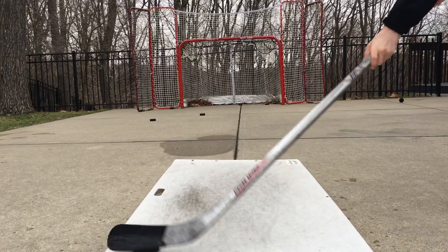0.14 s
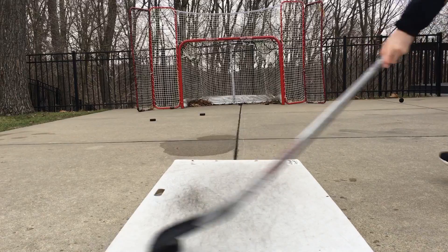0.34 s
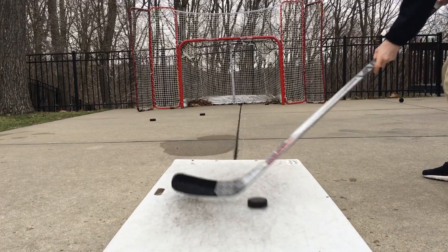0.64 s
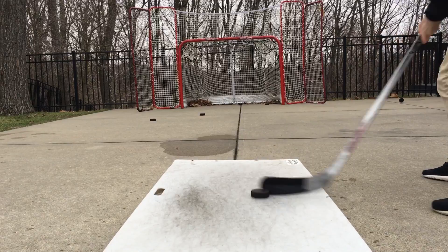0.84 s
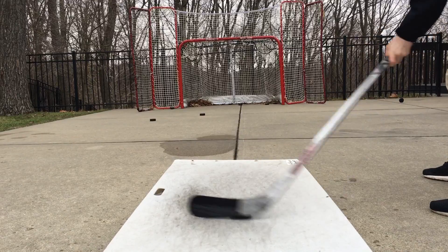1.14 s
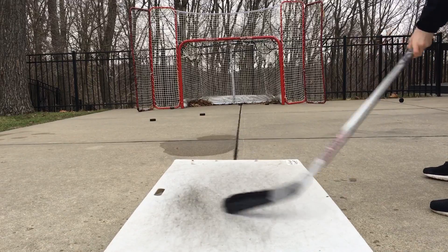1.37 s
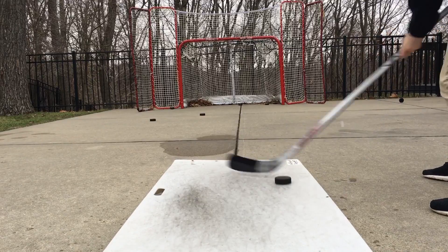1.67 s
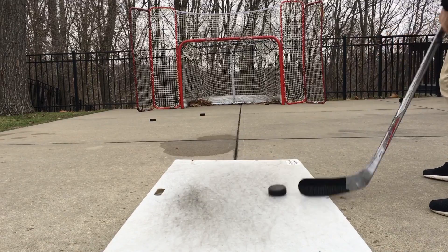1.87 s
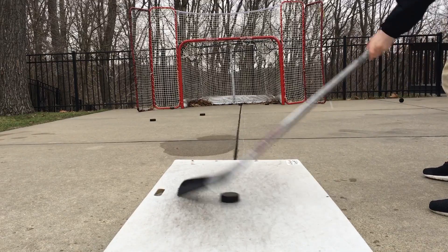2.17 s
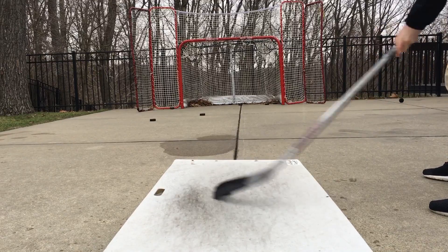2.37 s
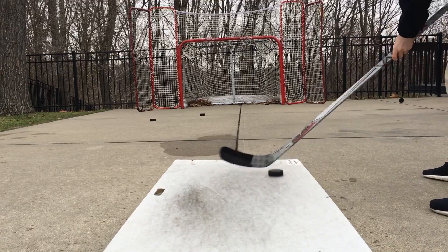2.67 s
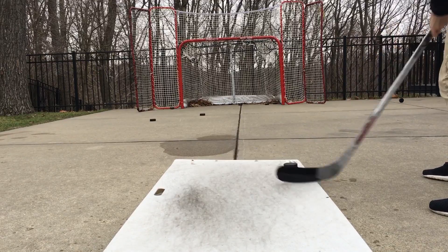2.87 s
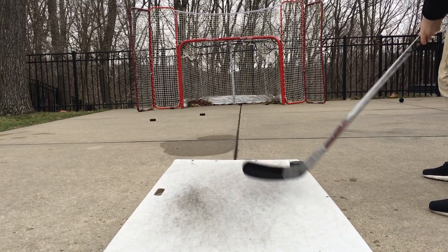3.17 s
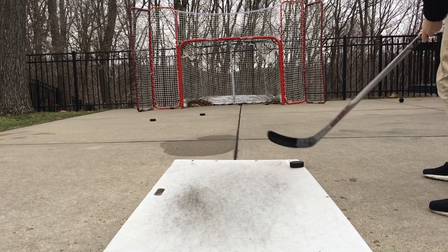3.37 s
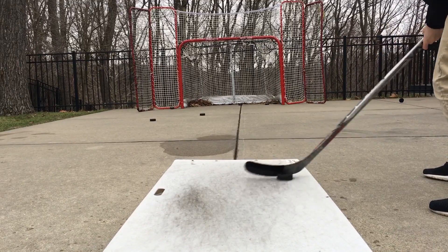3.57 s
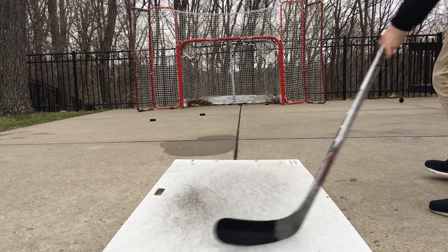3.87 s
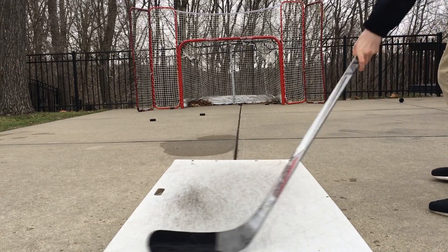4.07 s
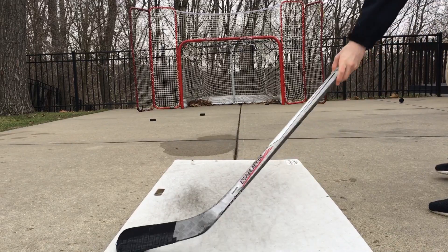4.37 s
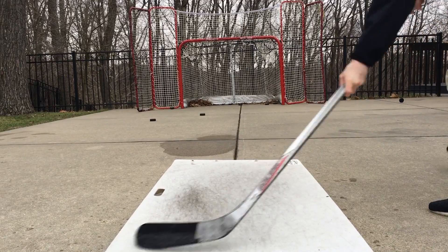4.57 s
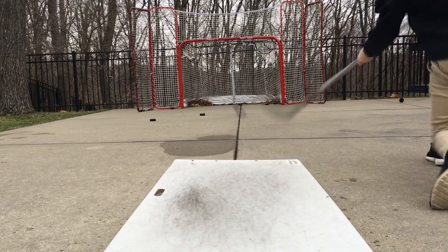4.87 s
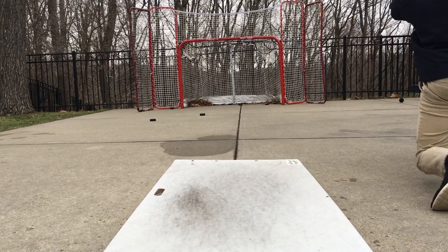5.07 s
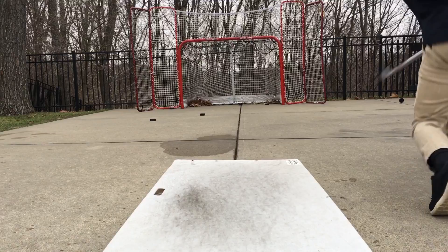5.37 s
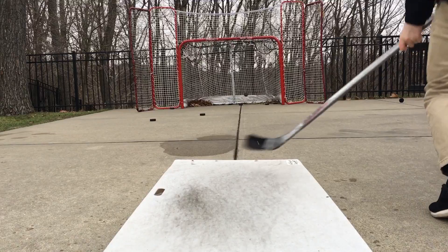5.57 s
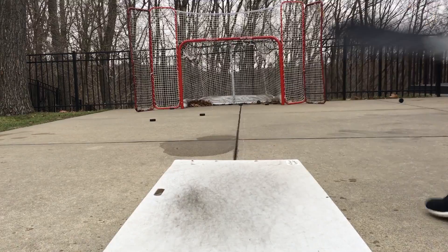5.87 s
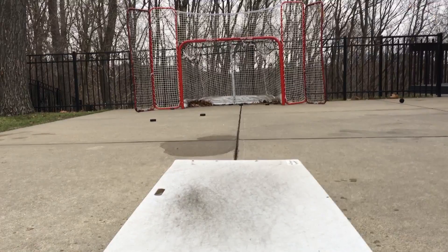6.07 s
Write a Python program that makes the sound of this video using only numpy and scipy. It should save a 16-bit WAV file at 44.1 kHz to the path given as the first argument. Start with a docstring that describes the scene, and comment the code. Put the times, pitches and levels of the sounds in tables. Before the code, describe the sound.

On a driveway, wind rumbles on the microphone over faint distant traffic while a hockey puck hisses across a plastic pad nearby. The stick blade clacks against puck and pad in an irregular rhythm, squeaking briefly, with a dull echo from the surroundings. After a few soft footsteps comes a sharp shot, followed by rustling mesh, a faint ring of the goal frame, one farther knock of the falling puck and shoes scuffing concrete.

```python
"""A puck slides, hissing, over a gritty plastic pad on a driveway, heard through one microphone
with wind buffeting it and a far road humming behind. A hockey stick dribbles the puck to and fro:
the blade knocks on puck and pad, its taped edge squeaks, and house and fence echo dully.
Shoes thump, then the shot goes into the net: the mesh rustles, the steel frame rings faintly,
the puck drops onto the goal's base and soles scuff the concrete."""
import sys
import numpy as np
from scipy import signal
from scipy.fft import rfft, irfft, next_fast_len
from scipy.io import wavfile
from scipy.ndimage import uniform_filter1d, map_coordinates

SR = 44100
rng = np.random.default_rng(int(sys.argv[2]) if len(sys.argv) > 2 else 0)


def store_wav(level_fs):
    """Save 16-bit WAV to argv[1]."""
    pcm = np.round(np.clip(np.atleast_2d(level_fs), -1, 1) * 32767)
    wavfile.write(sys.argv[1], SR, pcm.T.astype(np.int16))


N = 274919
TIME = np.arange(N) / SR


def from_db(db):
    """Decibels to gain."""
    return 10 ** (np.asarray(db) / 20)


def rms_one(x):
    """Scale to unit rms."""
    return x / np.sqrt(np.mean(x ** 2) + 1e-20)


def gain_curves(rows):
    """Each dB column of a timed table as a gain per sample."""
    times, *columns = np.transpose(rows)
    return [from_db(np.interp(TIME, times, db)) for db in columns]


def add(out, start_s, sound):
    """Mix a sound in at its start time."""
    i = int(start_s * SR)
    out[i:i + len(sound)] += sound[:N - i]


def colour(x, spectrum):
    """Shape a steady signal with a spectrum, at unit rms."""
    hz, db = np.transpose(spectrum)
    size = next_fast_len(N)
    bins_hz = np.maximum(np.fft.rfftfreq(size, 1 / SR), 1)
    gains = from_db(np.interp(np.log(bins_hz), np.log(hz), db))
    return rms_one(irfft(rfft(x, size) * gains, size)[:N])


def resonate(x, hz, width_hz):
    """One resonance with gain 1 at its peak."""
    r = np.exp(-np.pi * width_hz / SR)
    poles = [1, -2 * r * np.cos(2 * np.pi * hz / SR), r * r]
    return signal.lfilter(np.array([1, 0, -1]) * (1 - r * r) / 2, poles, x)


def drift(per_s):
    """A random curve that takes a new value per_s times a second."""
    knots = np.arange(0, TIME[-1] + 1, 1 / per_s)
    return np.interp(TIME, knots, rng.standard_normal(N)[:len(knots)])


def grit(per_s, spread_db, clump_db):
    """Tiny clicks of uneven size that come in clumps."""
    sizes = from_db(spread_db * np.minimum(rng.exponential(1, N), 4)) * rng.standard_normal(N)
    clicks = sizes * (rng.random(N) < per_s / SR)
    return rms_one(clicks * from_db(clump_db * drift(per_s=140)))


def patchy(x, depth_db, patch_s, patch_hz):
    """Each patch of grit briefly favours a few pitches of its own."""
    hz, times, frames = signal.stft(x, SR, nperseg=512)
    grid = np.meshgrid(hz / patch_hz, times / patch_s, indexing="ij")
    favour = map_coordinates(rng.standard_normal(frames.shape), grid, order=1, mode="mirror")
    return signal.istft(frames * from_db(depth_db * favour), SR)[1][:N]


# the four voices of friction on the pad, low to high: (frequency [Hz], relative level [dB])
PAD_RUMBLE = [(200, -8), (350, -3), (490, -12.5), (630, 8.5), (830, -1.5), (1000, -2), (1400, 0),
              (2100, -6), (2800, -8.5), (5000, -91)]
RASP = [(1400, -9.5), (2300, 0), (3300, 3), (4400, 1.5), (5100, -8.5), (6500, -37)]
HISS = [(4300, -33), (5200, -4.5), (5900, 5), (6600, 3.5), (7300, 4.5), (8100, -3.5), (8700, -6),
        (9700, -27.5), (10500, -42), (16000, -58)]
SIZZLE = [(7000, -38), (9500, 9.5), (10400, -0.5), (11500, 4), (13500, -2.5), (16000, -9)]
# the puck crossing the pad, louder with speed, bright when free and dull when the blade drags with it:
# (time [s], level [dB], brightness [dB])
GLIDE = [(0, -37.5, -10.5), (.1, -48, -1), (.3, -54, -5.5), (.4, -39.5, -2), (.72, -42.5, 0),
         (1.0, -42.5, 2.5), (1.3, -44, -2), (2.1, -41, 0), (2.8, -40, -1.5), (2.92, -43, -4),
         (3.16, -48, 4.5), (3.19, -63, 1), (3.4, -77, 6), (3.52, -86, 4), (3.54, -39, -1),
         (4.0, -44.5, 3.5), (4.22, -45.5, -4), (4.36, -66.5, 1), (4.59, -84, -11), (4.68, -40.5, 0.5),
         (4.9, -44, 9), (5.1, -64, -9)]
# the glide's balance: (rumble [dB], rasp [dB], hiss [dB], sizzle [dB])
GLIDE_MIX_DB = (2, -2, -1.5, -19.5)
# how the same four voices follow brightness: (slope [dB/dB]) each
GLIDE_BRIGHTENS = (-0.8, 0.13, 1, -0.24)
# the blade pressed down and swept along: (time [s], rise [s], fade [s], level [dB], edge sizzle [dB])
SWEEPS = [(.39, 0.037, 0.038, -40, -7), (.6, 0.083, 0.048, -40, -16), (.92, .05, 0.037, -38.5, -17),
          (1.07, 0.05, 0.029, -35.5, -16), (1.2, 0.044, 0.044, -36.5, -17), (1.37, 0.036, 0.01, -41, -5.5),
          (1.419, 0.01, 0.013, -30, -33), (1.54, 0.034, 0.069, -44.5, -14),
          (1.965, 0.0067, 0.025, -28, -24), (2.026, 0.0098, 0.01, -31, -26), (2.2, .035, 0.015, -38, -15),
          (2.41, 0.0067, 0.011, -29.5, -21), (2.78, 0.014, 0.057, -47, -27),
          (3.595, 0.0095, 0.014, -38, -24), (3.635, .008, 0.0082, -37.5, -25),
          (3.791, 0.049, 0.048, -39.5, -16), (4.79, 0.076, .06, -35, -12.5), (4.87, 0.054, 0.069, -35, -11)]
# a sweep's balance: (rumble [dB], rasp [dB], hiss [dB])
SWEEP_MIX_DB = (-11, -1.5, 0)
def sliding(rumble_follows, rumble_pivot_db, puck_gone_s):
    """Blade and puck catch on the grit: the same tiny clicks drive the pad and hiss at the edges."""
    catches = grit(per_s=12000, spread_db=2.6, clump_db=1.6)
    catches = patchy(catches, depth_db=3, patch_s=0.016, patch_hz=300)
    glide, brightness = gain_curves(GLIDE)
    pivot = from_db(rumble_pivot_db)
    rumble = pivot * (glide / pivot) ** rumble_follows  # takes a share of the glide's swing
    mix = from_db(GLIDE_MIX_DB)[:, None] * brightness ** np.array(GLIDE_BRIGHTENS)[:, None]
    power = (mix * [rumble, glide, glide, glide]) ** 2
    for s, rise, fade, db, sizzle_db in SWEEPS:
        from_peak = np.maximum((s - TIME) / rise, (TIME - s) / fade).clip(0, 10)
        swell = from_db(db) * np.exp(-from_peak ** 2 / 2)
        power += np.outer(from_db([*SWEEP_MIX_DB, sizzle_db]), swell) ** 2
    voices = [colour(catches, spectrum) for spectrum in (PAD_RUMBLE, RASP, HISS, SIZZLE)]
    on_pad = np.clip((puck_gone_s - TIME) * 10, 0, 1)
    return on_pad * np.sum(np.sqrt(power) * voices, axis=0)


# gusts right on the microphone: (time [s], level [dB])
WIND = [(0, -56), (.15, -40.5), (.5, -35), (.8, -43), (.9, -43.5), (1.25, -36.5), (1.65, -26.5),
        (1.9, -46.5), (2.55, -45), (2.62, -26.5), (2.75, -28.5), (2.86, -49), (3.12, -30), (3.6, -47),
        (4.08, -47), (4.24, -25.5), (4.4, -38.5), (4.6, -23), (4.8, -36.5), (5.15, -30), (5.6, -39),
        (5.97, -29), (6.23, -37.5)]
# their deep rumble and the flutter above it: (frequency [Hz], relative level [dB])
GUST = [(10, -14), (25, -4.5), (42, -3), (65, -5.5), (100, -15), (200, -28), (500, -110)]
FLUTTER = [(40, 2), (85, -0.5), (130, -5.5), (200, -8), (350, -23.5), (900, -92)]
def wind(rumble_db, flutter_db, flutter_follows):
    """Wind buffets the microphone; the flutter takes only a share of the gusts' swing."""
    gust, = gain_curves(WIND)
    rumble = from_db(rumble_db) * gust * colour(rng.standard_normal(N), GUST)
    flutter_gain = from_db(flutter_db) * (gust / np.median(gust)) ** flutter_follows
    return rumble + flutter_gain * colour(rng.standard_normal(N), FLUTTER)


# the road, far from the driveway: (time [s], drone level [dB], tyre whine level [dB])
TRAFFIC = [(0, -39.5, -51.5), (.45, -43.5, -50), (.7, -52.5, -43), (3.3, -55, -62.5), (5.2, -47.5, -54),
           (5.6, -47, -57), (5.95, -51, -48), (6.23, -53, -65)]
def traffic(drone_hz, drone_width_hz, whine_hz, whine_width_hz):
    """Far traffic arrives as two narrow bands of noise: a low drone and the whine of tyres."""
    out = np.zeros(N)
    bands = [(drone_hz, drone_width_hz), (whine_hz, whine_width_hz)]
    for gain, (hz, width_hz) in zip(gain_curves(TRAFFIC), bands):
        band = resonate(rng.standard_normal(N), hz, width_hz)
        out += gain * rms_one(resonate(band, hz, width_hz))
    return out


# open air all around the microphone: (frequency [Hz], relative level [dB])
OUTDOORS = [(30, 1), (150, 3.5), (240, 4.5), (320, -1.5), (450, -1), (700, -2), (1000, -2), (1400, -6),
            (2000, -18), (4000, -24.5), (9000, -29), (16000, -35)]
def outdoor_air(level_db):
    """A steady, low wash of outdoor noise."""
    return from_db(level_db) * colour(rng.standard_normal(N), OUTDOORS)


# house and fence, heard from the driveway: (delay [s], level [dB])
WALLS = [(.03, -17.5), (.078, -27), (0.1, -32.5), (.126, -30.5), (0.158, -48)]
def yard_echoes(x, trees_db, trees_t60, dull_hz):
    """Dull echoes from the walls and a faint scatter from the trees."""
    t = np.arange(SR) / SR
    scatter = rng.standard_normal(SR) * from_db(-60 * t / trees_t60) * np.minimum(t / 0.0096, 1)
    echoes = from_db(trees_db) * scatter / np.sqrt(np.sum(scatter ** 2))
    for delay_s, db in WALLS:
        echoes[int(delay_s * SR)] += from_db(db)
    dulling = signal.butter(1, [400, dull_hz], "band", fs=SR, output="sos")
    return signal.fftconvolve(x, signal.sosfilt(dulling, echoes))[:N]


# resonances heard in each knock: low ones of blade, puck and pad, plus the microphone's
# unchanging bright peak near 7 kHz: (frequency [Hz], relative level [dB], t60 [s])
KNOCK_RESONANCES = [(167, -1, 0.016), (404, -4.5, 0.023), (625.5, 4, 0.018), (1015, 4.5, 0.013),
                    (1460, -5.5, 0.025), (1730, -12, 0.011), (2135, -3, 0.011), (2820, 2, 0.0054),
                    (3700, -13, 0.0054), (6540, 6, 0.004), (7340, -34, 0.018), (11500, -38, .003)]
def knock_ring(force, pitch):
    """The force rings the knock's resonances; the spot that is hit shifts those below 3500 Hz."""
    out = 0
    for hz, db, t60 in KNOCK_RESONANCES:
        r = from_db(-60 / (t60 * SR))
        cosine = np.cos(2 * np.pi * hz * (pitch if hz < 3500 else 1) / SR)
        out += from_db(db) * signal.lfilter([1, -r * cosine], [1, -2 * r * cosine, r * r], force)
    return out


# borders of a knock's seven bands (boom, thud, knock, clack, crack, tick, air): (frequency [Hz])
BAND_EDGES_HZ = [130, 290, 550, 1200, 2400, 5000, 9500, 15000]
# each band against the blow's strength:
# (offset [dB], weight slope [dB/dB], pad slope [dB/dB], edge slope [dB/dB])
BLOW_COLOUR = [(-6.5, 0.86, 0.62, -0.094), (-2, 0.72, 0.12, -0.46), (1.5, 0.11, 0.98, -0.19),
               (0, 0, -.2, -0.26), (-1.5, 0.03, -0.39, 0.47), (-11, 0.036, -0.39, 1),
               (-30.5, 1, 0.43, 0.37)]
def blow(pitch, rebound_s, strength_db, weight_db, pad_db, edge_db,
         rebound=0.43, rattle=0.026, rattle_t60=0.05, contact_s=0.014, firm_db=-21.5):
    """The blade slaps down, touches again a few ms later and chatters."""
    t = np.arange(SR // 10) / SR
    # light, bright touches chatter more than flat or firm slaps
    glancing_db = np.clip(edge_db - weight_db - 0.91 * max(strength_db - firm_db, 0), 0, 25)
    chatter = from_db(0.57 * glancing_db - 60 * t / rattle_t60)
    force = rattle * chatter * rng.standard_normal(len(t))
    force[0] += 1
    force[int(rebound_s * SR)] += rebound
    ring = knock_ring(force, pitch)
    levels_db = strength_db + np.array(BLOW_COLOUR) @ [1, weight_db, pad_db, edge_db]
    out = 0
    for low_hz, high_hz, db in zip(BAND_EDGES_HZ, BAND_EDGES_HZ[1:], levels_db):
        band = signal.sosfilt(signal.butter(2, [low_hz, high_hz], "band", fs=SR, output="sos"), ring)
        contact_rms = np.sqrt(np.sum(band ** 2) / (contact_s * SR))
        out = from_db(db) * band / contact_rms - out  # alternate signs join the bands smoothly
    return out


# the pad shivering on the concrete: (frequency [Hz], relative level [dB])
PAD_RING = [(200, -17), (340, -11), (490, -14), (650, -1.5), (830, -5), (1020, -7), (1500, -9),
            (2800, -16.5), (4300, -18.5), (5100, -29), (7200, -30.5), (10000, -39), (16000, -52)]
# blows on the pad: (time [s], pitch [ratio], rebound [s], strength [dB], weight [dB], pad [dB], edge [dB])
# weight is how flat the blade lands, pad how much the pad takes, edge how sharp the contact is
BLOWS = [(0.5435, 0.99, 0.0025, -26.5, 6, 2.5, -3), (0.7871, 0.95, 0.0025, -25.5, -14, 1, -2),
         (0.8137, .93, 0.0027, -28.5, 4.5, 0.5, -8), (.883, 1.18, .0035, -39, 4, 11.5, 4),
         (1.0247, 0.54, 0.0031, -38.5, 2.5, 1, 16), (1.031, 1, 0.004, -42.5, 12, 11.5, -4),
         (1.3798, 0.93, 0.0048, -36, -8, 5.5, 11), (1.42, 0.94, 0.0034, -30.5, -9, 3, 8),
         (1.5851, 0.98, 0.0025, -24, 9.5, -1, -3.5), (1.7911, 0.95, 0.0039, -24.5, -16, -7, -7),
         (1.8143, 0.98, 0.0032, -20.5, -0.5, -12, -10.5), (1.935, 0.5, 0.0022, -42, -20, 4, 20),
         (2.0162, .79, .0047, -37.5, -7, 8, 9), (2.037, 0.935, 0.0041, -30, 5.5, 0.5, 1),
         (2.1176, 0.96, 0.0033, -36.5, -9, 13.5, 11), (2.374, 1.44, 0.004, -30.5, -6, 0.5, 7),
         (2.4232, 1.05, 0.0026, -30.5, -16, 7, 2), (2.6196, 0.98, 0.0026, -21, 2.5, -6, -10),
         (2.8033, 1.04, .0039, -32.5, -24, 5.5, 4), (2.9435, 1.1, 0.0044, -23, -23, -15, -1.5),
         (3.5269, .96, 0.0026, -22, -5.5, 1.5, -8.5), (3.8861, 0.86, .0052, -24, -22, -1, 10.5),
         (3.913, 1.03, 0.0027, -37, -10, 5, 12), (3.9695, 0.88, .0028, -25.5, 4, 5, -1),
         (4.001, 0.75, 0.0029, -39, -3, 9.5, -13), (4.8488, 0.55, 0.002, -39.5, -17, -4, 18),
         (4.8937, 0.99, .0053, -21.5, 2, 2.5, 3), (4.8965, 0.88, .003, -22, -5, -6, -4),
         (4.9039, 0.94, 0.0021, -26, -0.5, -9, -23), (4.9209, 0.91, 0.0039, -24, -1, -15, -3)]
def stick_knocks(shiver_db, shiver_rise_s, shiver_t60, settle_db, settle_rise_s, settle_t60):
    """Each blow knocks, sets the pad shivering and leaves the puck rocking until it settles."""
    knocks, shiver_power, settle_power = np.zeros((3, N))
    t = np.arange(SR // 2) / SR
    shiver = from_db(shiver_db - 60 * t / shiver_t60) * (1 - np.exp(-t / shiver_rise_s))
    settle = from_db(settle_db - 60 * t / settle_t60) * (1 - np.exp(-t / settle_rise_s))
    for s, pitch, rebound_s, strength_db, weight_db, pad_db, edge_db in BLOWS:
        add(knocks, s, blow(pitch, rebound_s, strength_db, weight_db, pad_db, edge_db))
        # a flat blade damps the shaking
        shaken = from_db(strength_db + 0.28 * pad_db + 0.14 * edge_db - 0.22 * weight_db)
        add(shiver_power, s, (shaken * shiver) ** 2)
        add(settle_power, s, (shaken * settle) ** 2)
    chatter = grit(per_s=7000, spread_db=2.2, clump_db=2.4)
    pad = np.sqrt(shiver_power) * colour(chatter, PAD_RING)
    puck = np.sqrt(settle_power) * colour(chatter, PAD_RUMBLE)
    return knocks + pad + puck


# the blade's edge turning on the pad:
# (time [s], length [s], level [dB], frequency [Hz], glide [octaves/s])
SQUEAKS = [(0.628, 0.043, -30, 1696, -0.5), (1.198, 0.029, -50, 4130, -1), (1.962, 0.014, -23, 8100, -3),
           (2.019, 0.023, -31, 7900, -1), (2.206, 0.028, -32, 3420, -0.5), (2.946, 0.0038, -16, 7700, 11.5),
           (3.599, 0.031, -28.5, 3200, -2.5), (3.638, 0.025, -26, 3170, 7)]
def squeaks(waver):
    """The taped edge sticks and slips at a rough, gliding rate."""
    out, t = np.zeros(N), np.arange(-SR // 10, SR // 10) / SR
    for s, length, db, hz, glide in SQUEAKS:
        jitter, flicker = rms_one(uniform_filter1d(rng.standard_normal((2, len(t))), size=30, axis=1))
        slip_hz = hz * 2 ** (glide * t) * (1 + waver * jitter)
        swell = from_db(db) * np.exp(-(2 * t / length) ** 2) * (1 + flicker / 2)
        add(out, s + t[0], swell * np.sin(2 * np.pi * np.cumsum(slip_hz) / SR))
    return out


# the player's steps on the driveway: (time [s], level [dB], frequency [Hz])
STEPS = [(4.225, -26.5, 126), (4.251, -22.5, 192), (4.554, -26.5, 225), (4.589, -38, 129),
         (4.731, -21, 189), (5.246, -29.5, 148)]
def footfalls(fade_s):
    """Soft soles land with a short low thump."""
    out, t = np.zeros(N), np.arange(SR // 10) / SR
    thump = t / fade_s * np.exp(1 - t / fade_s)
    for s, db, hz in STEPS:
        add(out, s, from_db(db) * thump * np.sin(2 * np.pi * hz * t))
    return out


# the net at the goal and shoes on the driveway: (time [s], rise [s], fade [s], level [dB], centre [Hz])
RUSTLES = [(5.02, 0.09, 0.02, -38.5, 2650), (5.246, 0.0084, 0.086, -34.5, 2400),
           (5.237, 0.0028, 0.029, -44, 7900), (5.252, .004, 0.018, -34.5, 900),
           (5.295, 0.034, 0.044, -43, 3540), (5.63, 0.11, 0.066, -45, 3260),
           (5.865, 0.004, 0.0065, -35, 3940), (5.935, 0.084, 0.21, -57.5, 3500),
           (6.226, 0.01, .03, -38, 2400)]
def rustles(width_share):
    """The net swallows the puck, and soles scuff over the concrete."""
    out, grains = np.zeros(N), grit(per_s=6000, spread_db=2, clump_db=2.5)
    for s, rise, fade, db, hz in RUSTLES:
        swell = np.exp(-np.maximum((s - TIME) / rise, (TIME - s) / fade).clip(0, 20))
        out += from_db(db) * swell * rms_one(resonate(grains, hz, hz * width_share))
    return out


# the goal's steel frame, away from the microphone: (frequency [Hz], level [dB], t60 [s])
FRAME_MODES = [(420, -39.5, 1), (570, -45, 1), (1780, -41.5, 1), (2270, -41, 1), (3300, -67, 0.45)]
def goal_frame(start_s, rise_s):
    """Broad clusters of close pipe modes ring on faintly after the shot."""
    t, white = np.maximum(TIME - start_s, 0), rng.standard_normal(N)
    rings = sum(from_db(db - 60 * t / t60) * rms_one(resonate(white, hz, hz / 11))
                for hz, db, t60 in FRAME_MODES)
    return rings * (1 - np.exp(-t / rise_s))


# the goal's base, away from the microphone: (frequency [Hz], relative level [dB], t60 [s])
BASE_MODES = [(380, -11, 0.035), (910, -7, 0.026), (1223, 1, 0.039), (1525, 6, 0.016), (1810, -3, 0.04),
              (2040, -15, 0.025), (2750, -13, 0.036)]
def puck_drop(start_s, level_db):
    """The puck drops out of the net: one short, far knock on the goal's base."""
    out, t = np.zeros(N), np.arange(SR // 5) / SR
    for hz, db, t60 in BASE_MODES:
        add(out, start_s, from_db(level_db + db - 60 * t / t60) * np.sin(2 * np.pi * hz * t))
    return out


def scene():
    """The driveway in mono: stick and puck with their echoes, the goal, the player and the weather."""
    play = stick_knocks(shiver_db=1.5, shiver_rise_s=0.0013, shiver_t60=0.17,
                        settle_db=-2.5, settle_rise_s=0.017, settle_t60=0.27)
    play += sliding(rumble_follows=0.6, rumble_pivot_db=-52.5, puck_gone_s=5.2)
    play += squeaks(waver=0.07) + puck_drop(start_s=5.5243, level_db=-20.5)
    echoes = yard_echoes(play, trees_db=-22, trees_t60=0.49, dull_hz=3500)
    goal = goal_frame(start_s=4.98, rise_s=0.015)
    shoes_and_net = footfalls(fade_s=0.0024) + rustles(width_share=0.56)
    ambience = wind(rumble_db=0.5, flutter_db=-40, flutter_follows=0.22)
    ambience += traffic(drone_hz=235.6, drone_width_hz=15, whine_hz=984, whine_width_hz=49)
    ambience += outdoor_air(level_db=-46.5)
    return (play + echoes + goal + shoes_and_net + ambience)[None]


def record(dry):
    """The loudest peaks are rounded and the treble is cut, 60 dB down from 16.5 kHz up."""
    rounded = dry / (1 + dry ** 6) ** (1 / 6)
    return signal.sosfilt(signal.cheby2(16, 60, 16500, fs=SR, output="sos"), rounded)


dry = scene()
out = record(dry)
store_wav(out)
```